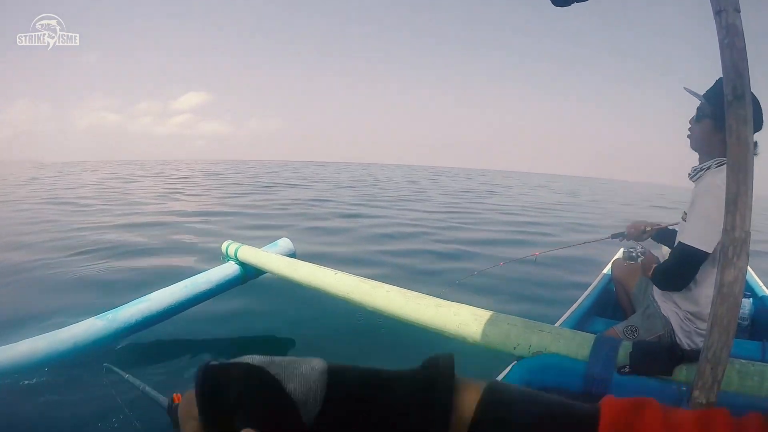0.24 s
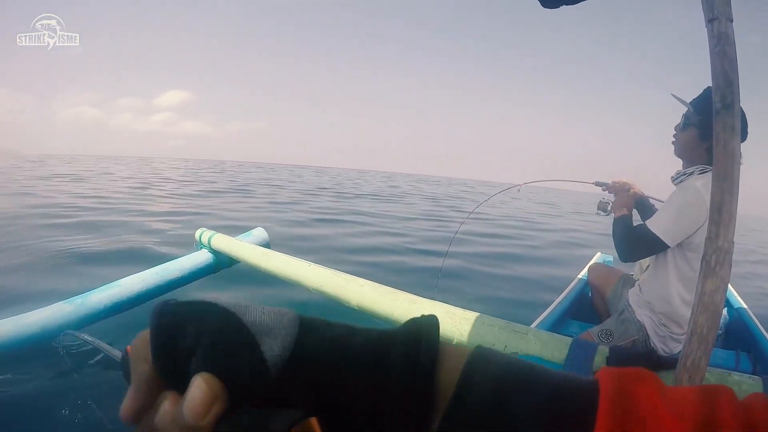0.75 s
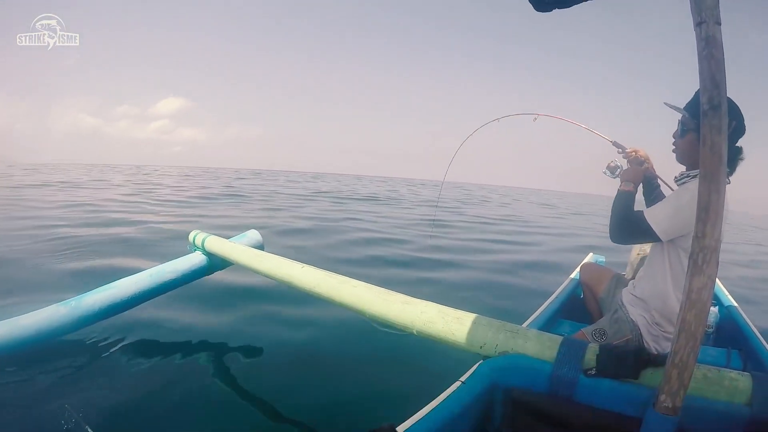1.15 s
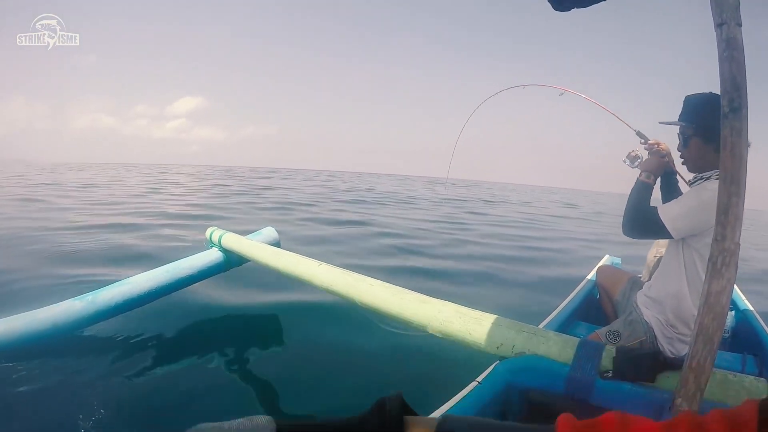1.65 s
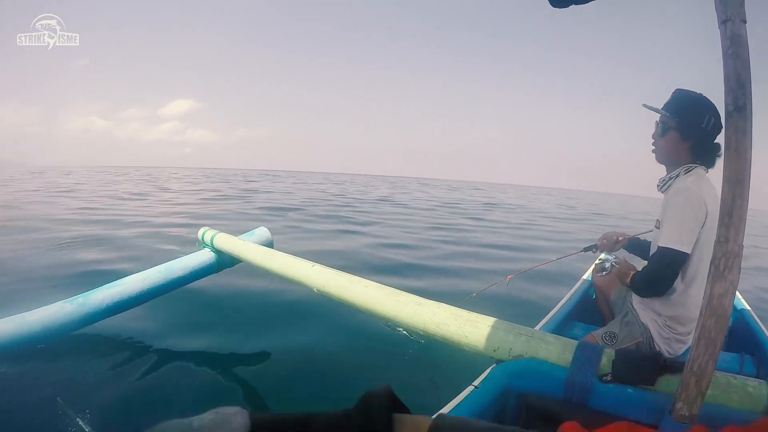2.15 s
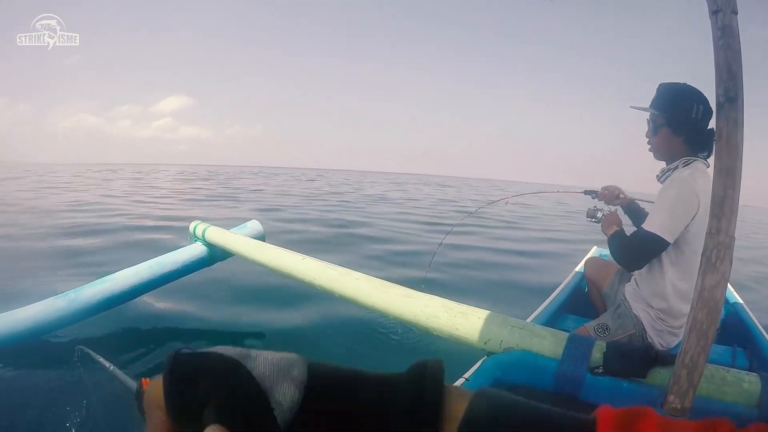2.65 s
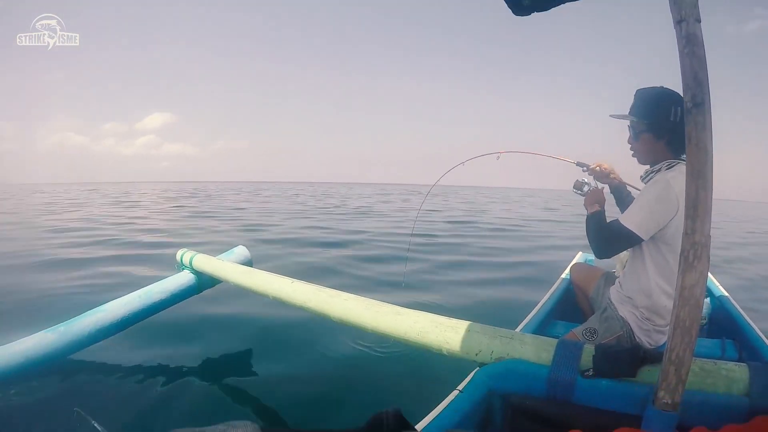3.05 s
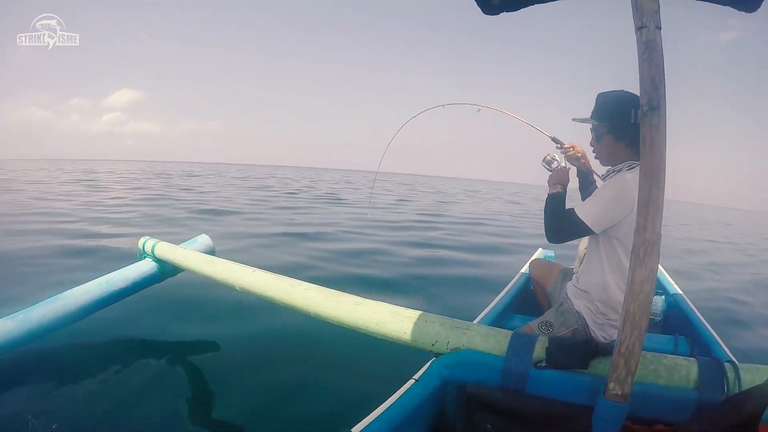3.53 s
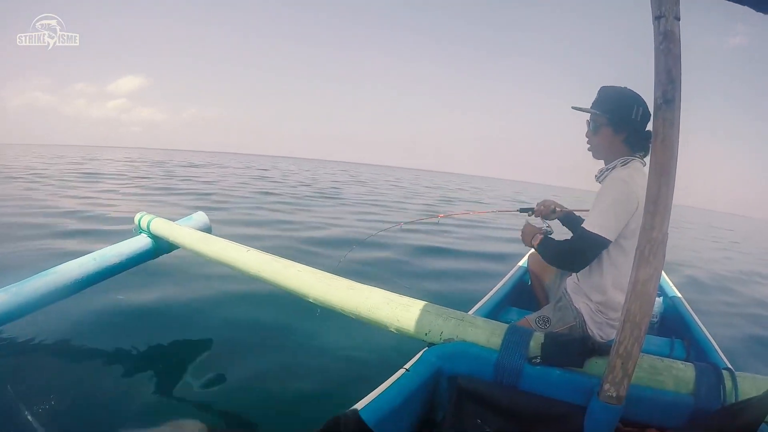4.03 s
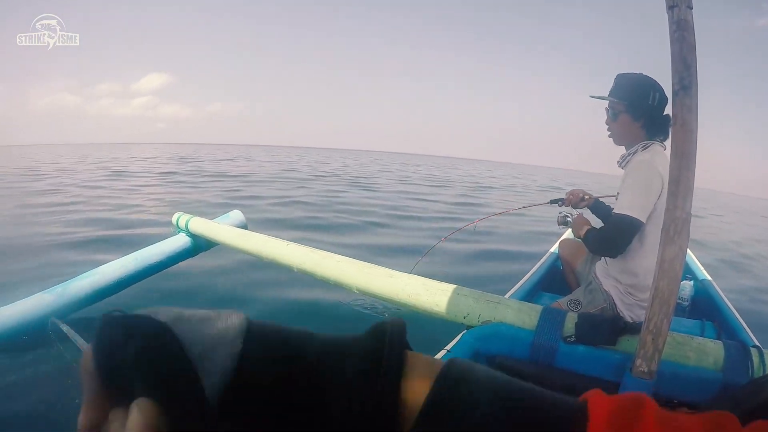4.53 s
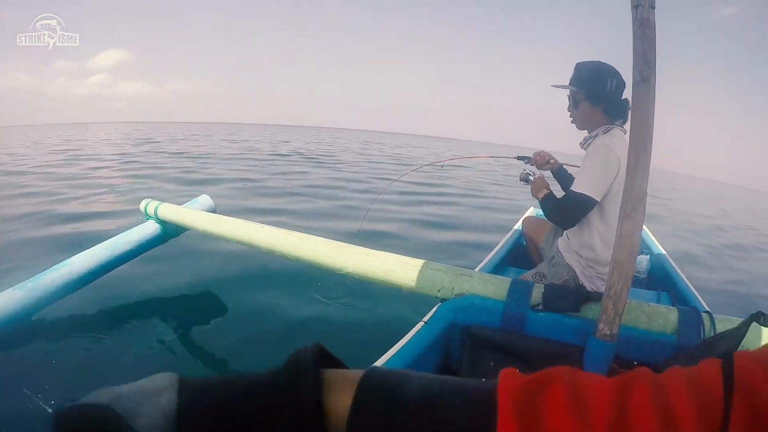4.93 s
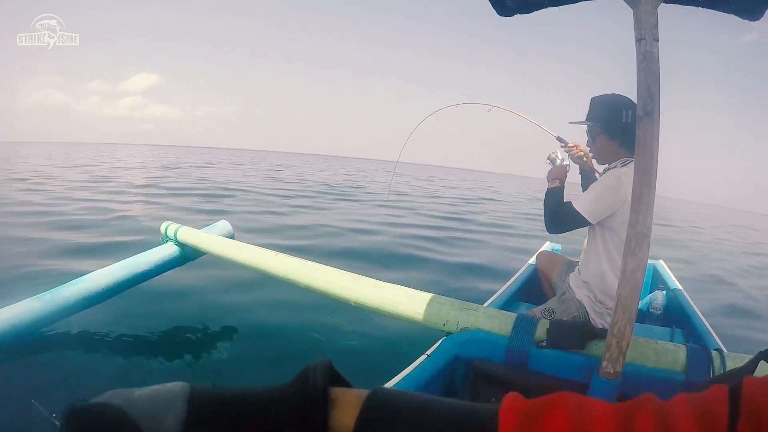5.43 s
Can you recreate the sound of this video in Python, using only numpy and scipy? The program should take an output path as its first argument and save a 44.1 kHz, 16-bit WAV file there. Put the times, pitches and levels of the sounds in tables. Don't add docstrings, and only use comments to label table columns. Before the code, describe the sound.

From the start, deep irregular wind thumps press on a microphone in a closed housing aboard a small boat on calm sea. A spinning reel is wound throughout: a thin, high, slightly raspy whir pulsing nearly four times a second, each push swelling and gliding up in pitch with a rapid rotor flutter, then dipping as the handle coasts. Soft gear rubbing lies beneath it. Fine drag ticks run quickly around 0.6-1.1 seconds, click singly from 1.2 to 1.8, race again at 2.3-2.7, then scatter, with a soft slip near 4.5. Small drops plop at about 0.4, 1, 2.2 and 2.6 seconds; from 3 onward wavelets slap the wooden hull more often, with clearer plops near 3.1, 3.7, 4.2, 4.5 and 5.1-5.3. At 5.4 seconds a single loud, clipped knock cracks against the mount, rattles and leaves a fading low rocking; everything else drops in level afterward.

```python
import sys
import numpy as np
from scipy import signal
from scipy.fft import rfft, irfft
from scipy.io import wavfile
from scipy.ndimage import uniform_filter1d

SR = 44100
rng = np.random.default_rng(int(sys.argv[2]) if len(sys.argv) > 2 else 0)


def boost(x):
    u = np.asarray(x, float) / 20
    return 10 ** u


def wav_record(signal):
    frames = np.transpose(np.atleast_2d(signal))
    bounded = np.clip(frames, -1, 1)
    quanta = np.round(bounded * 32767).astype(np.int16)
    wavfile.write(sys.argv[1], SR, quanta)


N = 250488
TIME = np.arange(N) / SR

# top_speed_s [s], slow_pitch_hz [Hz], top_pitch_hz [Hz],
# rotor_lead [turns], wobble_hz [Hz]
HANDLE_TURNS = [(0.1, 2675, 2528, -0.3, 458), (0.342, 2953, 2955, 0.21, 402),
                (0.598, 2443, 2784, 0.01, 444), (0.87, 2305, 2931, -0.1, 368),
                (1.131, 2615, 2993, 0.03, 487), (1.391, 2365, 3029, -0.06, 523),
                (1.68, 2536, 2999, -0.42, 494), (1.95, 2362, 3072, -0.21, 525),
                (2.211, 2365, 3106, -0.19, 423), (2.492, 2189, 3114, 0.03, 410),
                (2.748, 2363, 3222, -0.23, 461), (3.024, 2395, 2952, 0.28, 437),
                (3.282, 2602, 3033, 0.27, 480), (3.553, 2365, 2867, 0.38, 413),
                (3.809, 2486, 2988, 0.14, 477), (4.074, 2409, 3072, 0.08, 435),
                (4.363, 2059, 3090, 0.35, 432), (4.659, 2381, 2998, 0.09, 420),
                (4.918, 2418, 2864, -0.04, 456), (5.204, 2265, 2987, 0.01, 434),
                (5.464, 2561, 2925, 0.1, 563), (5.712, 2107, 3294, -0.6, 366)]
PUSH_LEVELS = [-38.9, -36.5, -39.5, -38, -34.5, -36, -39, -39.5, -37.5, -38, -39.5, -38, -36, -39.5, -38.5,
               -34.5, -38, -36.0, -37.4, -36.5, -39.5, -39.5]
SPEED_UP, PUSH_LEAD, PUSH_SHAPE = .266, .164, .78
LOUD_LEAD, LOUD_SHAPE = .16, 1.5
COAST_DB = -12
ROTOR_PER_S = 22.92
# pitch_hz [Hz], width_hz [Hz], level_db [dB]
REEL_MODES = [(2150, 167, 0), (2630, 240, -3), (3244, 560, 4), (5900, 360, -26), (6600, 390, -0.5)]
# delay_s [s], level_db [dB]
BOAT_ECHOES = [(.0021, -8), (.0052, -11), (.011, -14)]
# pitch_hz [Hz], width_hz [Hz], level_db [dB]
GEAR_MODES = [(2704, 260, 2), (3593, 190, 0), (5710, 190, -15.5), (6700, 820, -15)]

# centre_s [s], length_s [s], buffet_db [dB], flutter_db [dB]
WIND_GUSTS = [(0, 0.074, -9.5, -35), (0.155, 0.11, -15.5, -41), (0.458, 0.23, -15.5, -42),
              (0.827, .1, -8.5, -32), (1.018, .07, -14.5, -41), (1.283, 0.29, -21, -38),
              (1.576, 0.072, -9.5, -35), (1.708, .08, -15.5, -41.5), (1.967, 0.25, -20.5, -47),
              (2.134, 0.062, -10.5, -46), (2.382, 0.24, -20, -40), (2.752, 0.13, -13, -38.5),
              (3.114, 0.29, -18, -40.5), (3.297, 0.091, -17, -33), (3.355, .06, -10.5, -39),
              (3.491, 0.065, -10, -35.5), (3.613, 0.067, -13, -38), (3.884, 0.19, -21, -29),
              (4.108, 0.11, -16, -40), (4.227, 0.15, -21.5, -31.5), (4.502, 0.16, -12.5, -36.5),
              (4.75, 0.4, -16.5, -36), (4.926, 0.067, -18.5, -37.5), (5.092, .1, -17.5, -28),
              (5.332, 0.065, -27.5, -26.5), (5.457, 0.1, -15, -40), (5.647, .07, -15.5, -35.5)]
CALM_BUFFET_DB, CALM_FLUTTER_DB = -24, -45
# pitch_hz [Hz], level_db [dB]
BUFFET_SPECTRUM = [(3, -66), (8, -9.5), (12, -11), (16, 0), (21, -4.5), (30, -11), (45, -28.5), (90, -32.5),
                   (200, -88)]
# pitch_hz [Hz], level_db [dB]
FLUTTER_SPECTRUM = [(20, -33), (45, -1), (70, -18), (120, -11.5), (200, -24), (350, -37), (800, -74)]

# pitch_hz [Hz], level_db
# [dB per Hz]
SEA_SPECTRUM = [(120, -7), (200, -8.5), (300, -9.5), (550, -11.5), (1070, -12.5), (1800, -14.5), (2700, -5),
                (3400, -12), (4100, -21), (6680, -23.5), (11300, -33.5), (14300, -36), (15200, -32)]
SEA_DB = -46
# centre_s [s], length_s [s], level_db [dB]
HULL_LAPS = [(0, .025, -36), (.45, .05, -50), (.75, .04, -50.5), (.85, 0.027, -46), (.96, 0.044, -44.5),
             (1.15, .1, -52), (1.22, 0.018, -47), (1.45, 0.051, -43), (1.64, 0.036, -45), (1.85, .03, -53),
             (1.93, 0.033, -51), (2.2, .1, -54), (2.46, .1, -59), (3.0, .05, -43.5), (3.1, 0.014, -37),
             (3.24, 0.11, -36.5), (3.39, 0.044, -38.5), (3.6, 0.091, -45), (3.71, 0.081, -36),
             (3.91, 0.091, -32), (4.05, 0.13, -43), (4.18, 0.066, -34.5), (4.29, 0.079, -44),
             (4.51, 0.042, -42.5), (4.6, 0.11, -47), (4.74, 0.11, -44), (4.87, .07, -43.5),
             (5.0, 0.062, -38), (5.16, 0.059, -40), (5.31, 0.085, -35)]
TRICKLE_DB = -57.5
# pitch_hz [Hz], width_hz [Hz], level_db [dB]
HULL_MODES = [(720, 470, 0.5), (1080, 790, 10.5), (1776, 1300, 0), (2250, 1050, -5.5), (3900, 1600, -16)]
# start_s [s], peak_db [dB], pitch_hz [Hz]
WATER_DROPS = [(0.437, -36, 1350), (0.448, -31, 1600), (0.844, -36, 560), (0.961, -30.5, 1080),
               (1.212, -31, 510), (1.636, -46, 1090), (2.243, -27, 1410), (2.329, -37, 624),
               (2.598, -22.5, 1730), (3.0885, -23, 545), (3.707, -20.5, 1040), (4.173, -24, 1080),
               (4.312, -25.5, 1560), (4.519, -24, 614), (5.136, -23, 1860), (5.317, -25, 1330)]

# start_s [s], peak_db [dB], pitch_hz [Hz]
PAWL_TICKS = [(1.18, -42, 12300), (1.1975, -46, 11500), (1.2214, -40, 9750), (1.2504, -37, 9990),
              (1.288, -40, 9000), (1.3324, -45, 7590), (1.4334, -47, 7800), (1.4753, -42, 9750),
              (1.507, -40, 7900), (1.5362, -43, 8810), (1.5681, -43, 7910), (1.609, -41.5, 11800),
              (1.6609, -43, 11800), (1.718, -50, 12000), (1.755, -49, 12000), (2.7579, -49, 8240),
              (2.8068, -37, 8300), (2.8387, -45, 8220), (2.8687, -47, 8900), (2.9021, -43, 8730),
              (2.954, -43, 8400), (3.1333, -46, 8690), (3.164, -51, 8470), (3.337, -47, 10200),
              (3.4367, -42, 7910), (3.6913, -45, 10100), (4.1383, -43, 8236), (4.8043, -42, 7683),
              (5.242, -45, 8940), (5.3105, -44, 8450)]
# start_s [s], length_s [s], top_rate [ticks/s], peak_db [dB]
DRAG_SLIPS = [
    (.645, .4, 66, -45.5),
    (1.11, .065, 85, -47),
    (2.345, .335, 128, -45),
    (4.45, .22, 60, -49),
]
CREEP_PER_S, BLUR_DB = 38, -21
# pitch_hz [Hz], level_db [dB]
SPRING_MODES = [(8500, 0), (10050, -2), (11700, -4.5), (13300, -7)]

KNOCK_S, CRACK_DB, RATTLE_DB = 5.3812, 9, -15
ROCK_DB, ROCK_PER_S, ROCK_T60 = 2.8, 25.0, .23
# pitch_hz [Hz], width_hz [Hz], level_db [dB]
MOUNT_MODES = [(614, 68, 15), (1100, 930, 0), (1720, 670, -2.5), (2700, 430, -12), (3860, 260, 3),
               (4310, 300, -6.5), (6370, 440, -34), (9400, 1100, -45)]


def evened(x):
    return x / np.sqrt(np.mean(x ** 2) + 1e-20)


def coloured(points):
    point_hz, point_db = np.transpose(points)
    hz = np.fft.rfftfreq(N, 1 / SR)
    gain = boost(np.interp(np.log(hz + 1), np.log(point_hz + 1), point_db))
    return evened(irfft(rfft(rng.standard_normal(N)) * gain, N))


def drift(top_hz):
    gain = 1 / (1 + (np.fft.rfftfreq(N, 1 / SR) / top_hz) ** 4)
    return evened(irfft(rfft(rng.standard_normal(N)) * gain, N))


def dull(x, hz):
    return signal.sosfilt(signal.butter(4, hz, fs=SR, output="sos"), x)


def resonate(x, hz, width):
    turn = np.exp(2j * np.pi * np.cumsum(hz * np.ones(len(x))) / SR)
    r = np.exp(-np.pi * width / SR)
    return 2 * (turn * signal.lfilter([1 - r], [1, -r], x / turn)).real


def body(x, modes):
    out = 0
    for hz, width, db in modes:
        r = np.exp(-np.pi * width / SR)
        pole = [1, -r * np.exp(2j * np.pi * hz / SR)]
        once = 2 * signal.lfilter([1 - r], pole, x).real
        twice = 2 * signal.lfilter([1 - r], pole, once).real
        out = out + boost(db) * twice
    return out


def ring(hz, t60, rise=0.0006, glide=0.):
    t = np.arange(4000) / SR
    return (1 - np.exp(-t / rise)) * boost(-60 * t / t60) * np.sin(2 * np.pi * hz * t * (1 + glide * t))


def swells(rows, floor_db):
    power = sum(boost(2 * db) * np.exp(-(2.53 * (TIME - s) / length) ** 2) for s, length, db in rows)
    return 10 * np.log10(power + boost(2 * floor_db))


def add(mix, s, sound):
    part = mix[round(s * SR):][:len(sound)]
    part += sound[:len(part)]


def handle():
    s, slow_hz, top_hz, lead, wobble_hz = np.transpose(HANDLE_TURNS)
    k = np.arange(len(s))
    turn = np.interp(TIME, np.r_[2 * s[0] - s[1], s], np.r_[-1, k])
    steps = np.arange(2 * len(s))
    step = np.interp(turn, np.c_[k - SPEED_UP, k].ravel(), steps)
    eased = np.floor(step) + .5 - .5 * np.cos(np.pi * (step % 1))
    speed_hz = np.interp(eased, steps, np.c_[slow_hz, top_hz].ravel())
    push = np.abs(np.cos(np.pi * (turn + PUSH_LEAD))) ** (2 * PUSH_SHAPE)
    row = np.clip(np.floor(turn + PUSH_LEAD + .5).astype(int), 0, len(s) - 1)
    rotor = ROTOR_PER_S * (TIME - s[row]) + lead[row]
    coasting = 1 - np.abs(np.cos(np.pi * (turn + LOUD_LEAD))) ** LOUD_SHAPE
    db = np.interp(turn + PUSH_LEAD, k, PUSH_LEVELS) + COAST_DB * coasting
    return speed_hz, wobble_hz[row], push, rotor, db


def reel():
    speed_hz, wobble_hz, push, rotor, db = handle()
    swing = push * np.cos(2 * np.pi * rotor)
    hz = speed_hz + wobble_hz * swing + 55 * drift(115.3)
    phase = 2 * np.pi * np.cumsum(hz) / SR
    strum = boost(3.0 * drift(110)) * np.cos(phase)
    overtone = boost(-16.5 + 4.5 * drift(120)) * np.cos(2 * phase)
    noise = rng.standard_normal(N)
    scrape = evened(resonate(resonate(noise, hz, 490), hz, 510))
    fuzz = evened(resonate(resonate(noise, 2 * hz, 1100), 2 * hz, 730))
    song = strum + overtone + .45 * scrape + .11 * fuzz
    shaped = evened(2.15 * song + body(song, REEL_MODES))
    return boost(db + 1.5 * swing) * shaped


def gears():
    push_db = handle()[-1]
    rub = evened(body(rng.standard_normal(N), GEAR_MODES))
    return boost(0.64 * push_db - 29.5 + 6.26 * drift(44)) * rub


def wind():
    s, length, buffet_db, flutter_db = np.transpose(WIND_GUSTS)
    buffet_level = swells(zip(s, length, buffet_db), CALM_BUFFET_DB)
    flutter_level = swells(zip(s, 1.31 * length, flutter_db), CALM_FLUTTER_DB)
    flutter = evened(coloured(FLUTTER_SPECTRUM) * boost(3.5 * drift(18)))
    return boost(buffet_level) * coloured(BUFFET_SPECTRUM) + boost(flutter_level) * flutter


def sea():
    patches_db = .7 * drift(8) + 1.1 * drift(60)
    return boost(SEA_DB + patches_db) * coloured(SEA_SPECTRUM)


def laps():
    db = swells(HULL_LAPS, TRICKLE_DB)
    size = boost(2.5 * np.minimum(rng.exponential(1, N), 4)) * rng.choice([-1., 1.], N)
    landed = rng.random(N) < 6000 / SR
    clicks = size * landed * boost(2.4 * drift(80))
    return boost(db) * evened(dull(body(clicks, HULL_MODES), 4900))


def drops():
    out = np.zeros(N)
    for s, db, hz in WATER_DROPS:
        splash = dull(resonate(rng.standard_normal(4000), 1400, 1500), 6200)
        slap = splash * boost(-60 * TIME[:4000] / 0.007)
        bubble = ring(hz, 0.024, rise=0.0014, glide=2.3)
        add(out, s, boost(db) * (bubble + 0.66 * slap))
    return out


def pawl(db, hz):
    snap = ring(hz, .006) + .35 * ring(1.25 * hz, .004) + .5 * ring(11500, .002, rise=.0001)
    return boost(db + 1.5) * snap


def drag():
    fine = (rng.random(N) < 400 / SR) * rng.standard_normal(N)
    blur_rows = [(s + length / 2, 0.89 * length, db + BLUR_DB) for s, length, _, db in DRAG_SLIPS]
    rattle = evened(body(fine, [(8530, 1100, 3), (10200, 1400, 2), (12300, 3000, -7)]))
    out = boost(swells(blur_rows, -75)) * rattle
    for s, db, hz in PAWL_TICKS:
        add(out, s, pawl(db, hz))
    snaps = np.zeros(N)
    for s, length, top_per_s, db in DRAG_SLIPS:
        t = np.arange(0, length, 1 / SR)
        per_s = CREEP_PER_S + (top_per_s - CREEP_PER_S) * np.sin(np.pi * t / length) ** .8
        teeth = np.cumsum(per_s) / SR
        add(snaps, s, boost(db) * np.diff(np.floor(teeth), prepend=-1))
    for hz, db in SPRING_MODES:
        uneven = snaps * boost(db + 3.5 * drift(30))
        out = out + signal.oaconvolve(uneven, ring(hz, .004, rise=.0003))[:N]
    return out


def knock():
    t = TIME[:8000]
    crack = ring(1334, 0.018, rise=0.00021, glide=-55.0)
    crack = crack + 0.15 * ring(3610, 0.014) + .35 * ring(300, .022) + .04 * ring(620, .08, rise=0.0027)
    crack = crack + .04 * ring(8000, .004, rise=.0001)
    shake = rng.standard_normal(8000) * boost(-60 * t / .3) / (1 + (t / .022) ** 12)
    rattle = 3.93 * body(shake, MOUNT_MODES)
    swings = ROCK_PER_S * t + .65 * (1 - np.exp(-t / .0068))
    rock = boost(ROCK_DB - 60 * t / ROCK_T60) * np.sin(2 * np.pi * swings)
    out = np.zeros(N)
    add(out, KNOCK_S, boost(CRACK_DB) * crack)
    add(out, KNOCK_S, boost(RATTLE_DB) * rattle + rock)
    return out


def scene():
    near = reel()
    echoes = sum(boost(db) * np.roll(near, round(s * SR)) for s, db in BOAT_ECHOES)
    winding = 1.1 * (near + echoes) + gears()
    water = sea() + laps() + drops()
    return (winding + wind() + water + drag() + knock())[None]


def roll_off(x):
    return signal.sosfilt(signal.butter(12, 15570, fs=SR, output="sos"), x)


def record(dry):
    power_db = 10 * np.log10(abs(uniform_filter1d(dry[0] ** 2, 800, origin=399)) + 1e-12)
    fall_db = TIME * 14.5
    held_db = np.maximum.accumulate(power_db + fall_db) - fall_db
    over_db = np.maximum(held_db + 6, 0)
    ducked = dry / boost(uniform_filter1d(over_db, 3000, origin=1499))
    return roll_off(np.clip(ducked, -1, 1))


dry = scene()
out = record(dry)
wav_record(out)
```